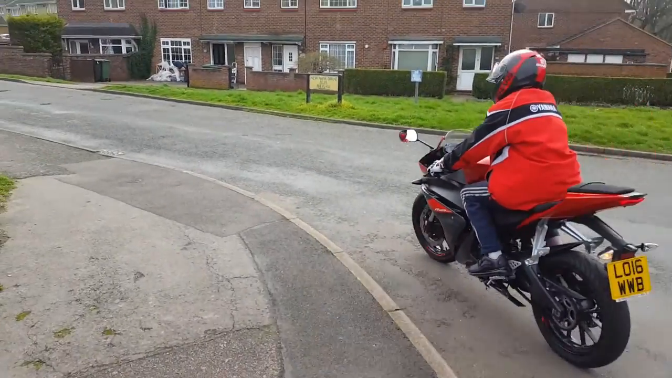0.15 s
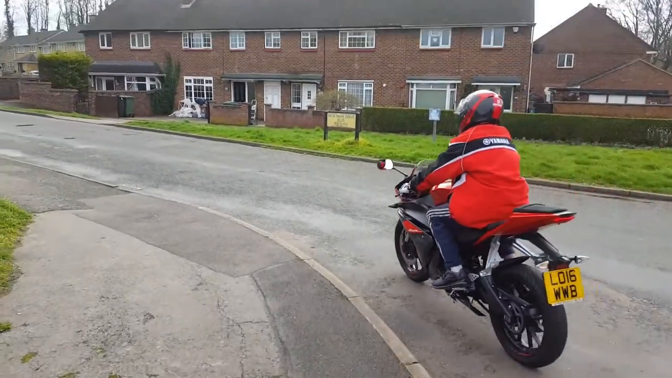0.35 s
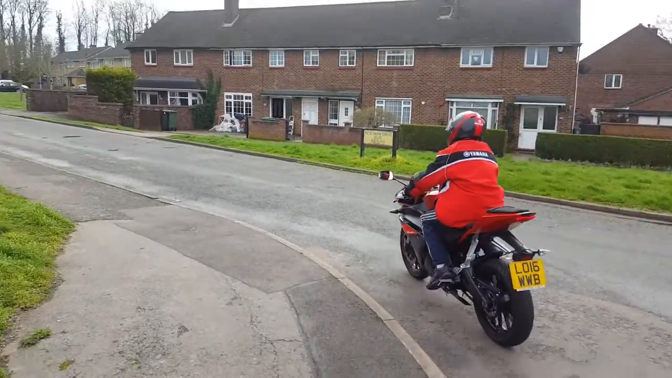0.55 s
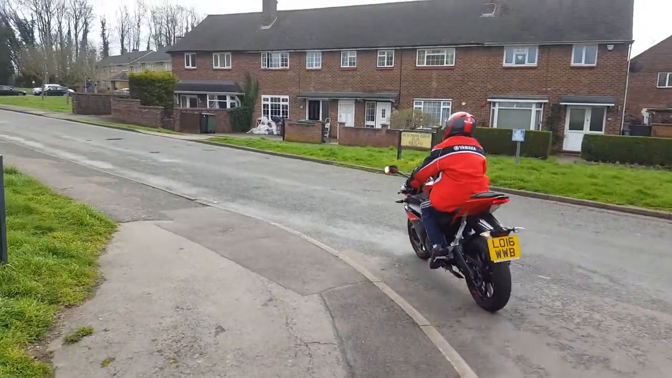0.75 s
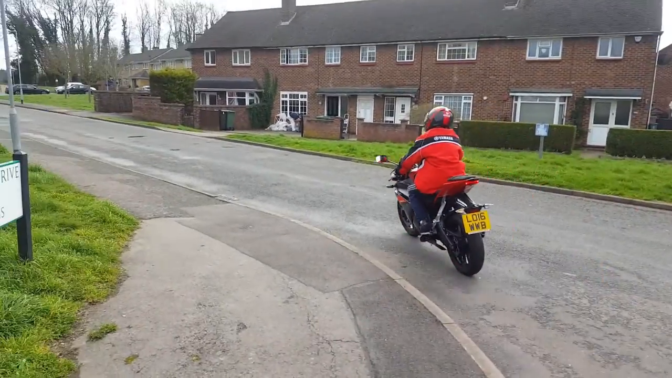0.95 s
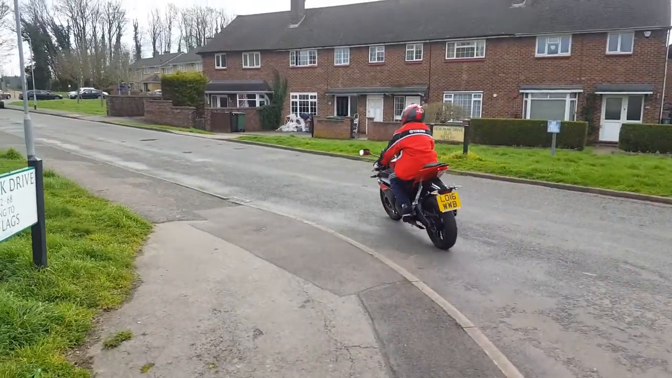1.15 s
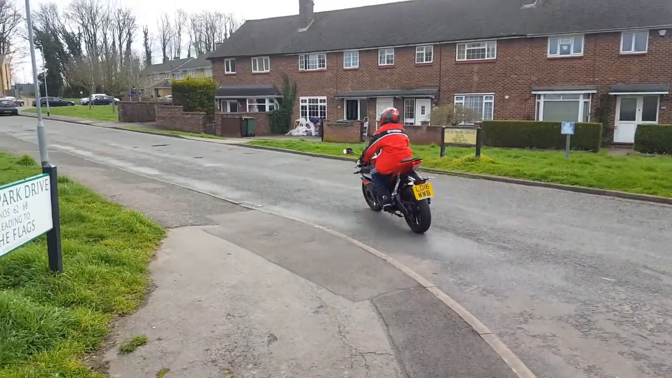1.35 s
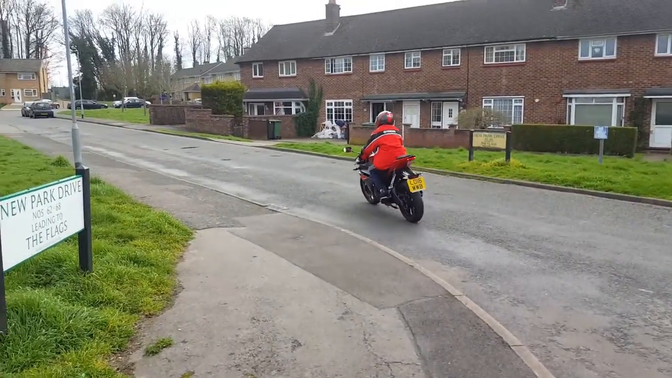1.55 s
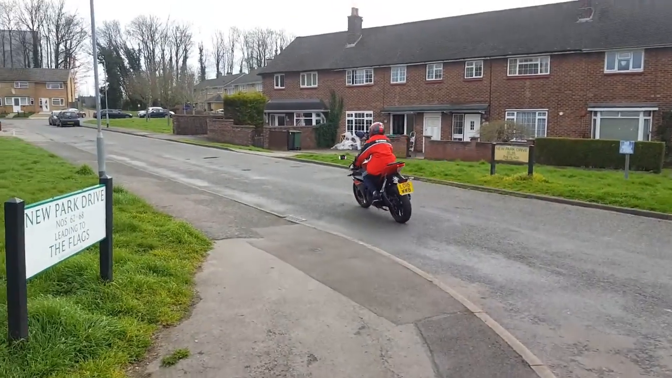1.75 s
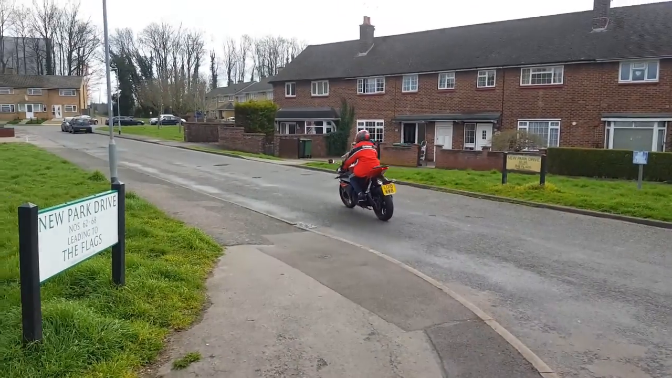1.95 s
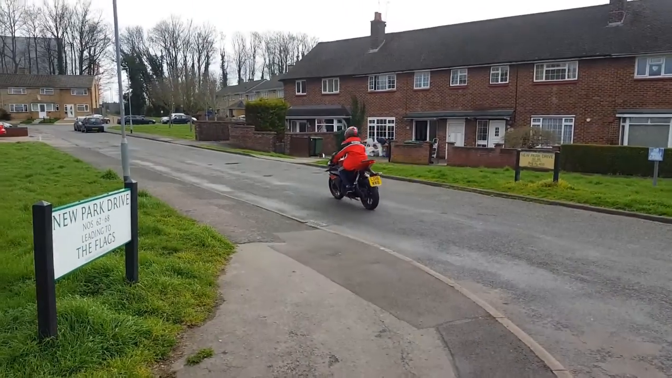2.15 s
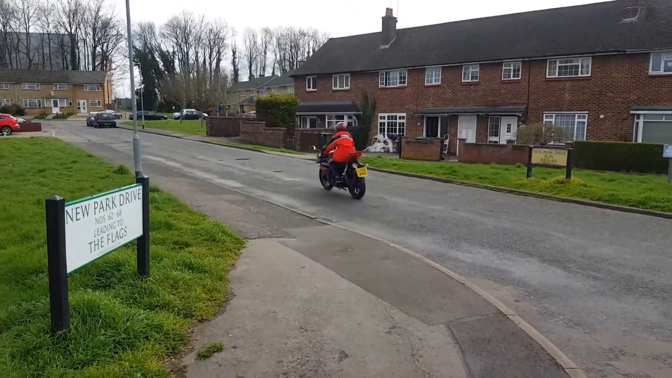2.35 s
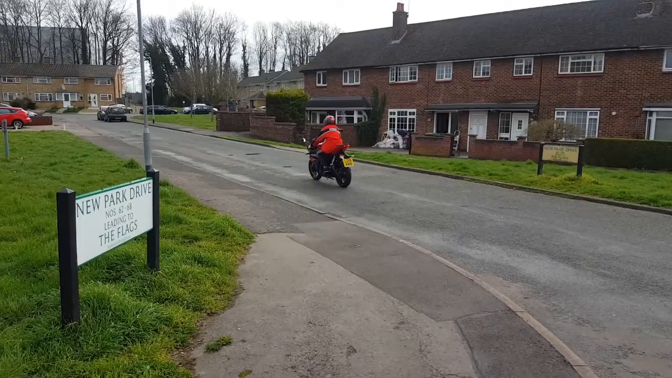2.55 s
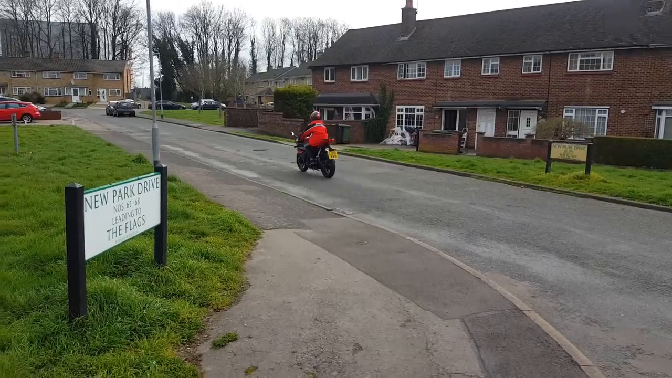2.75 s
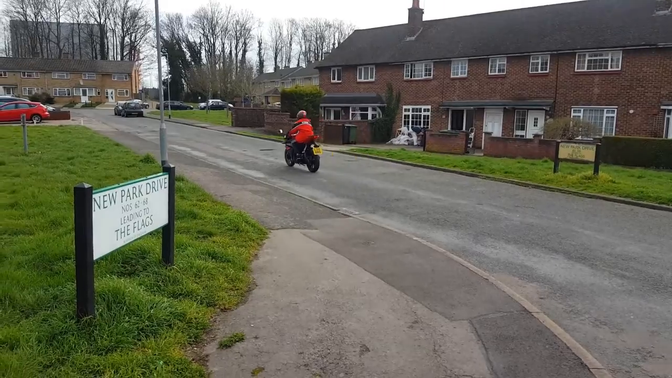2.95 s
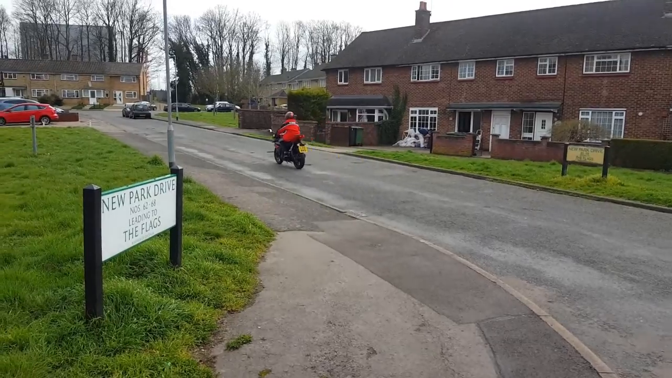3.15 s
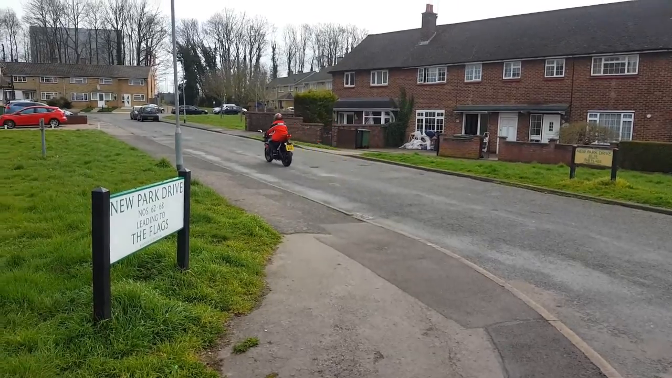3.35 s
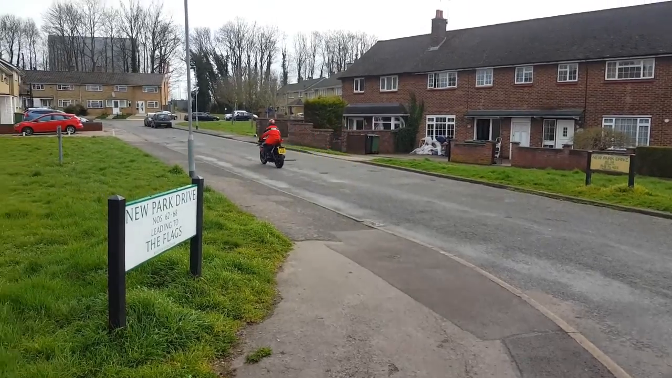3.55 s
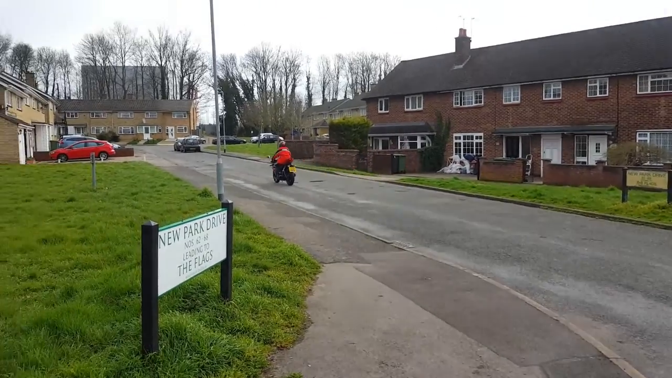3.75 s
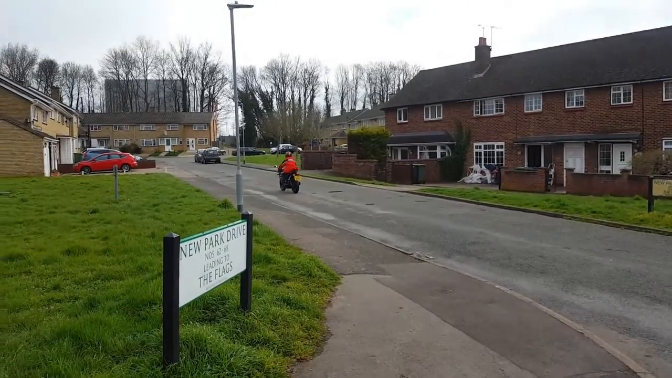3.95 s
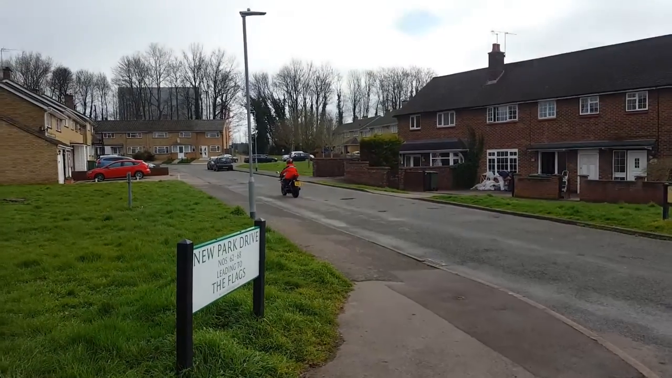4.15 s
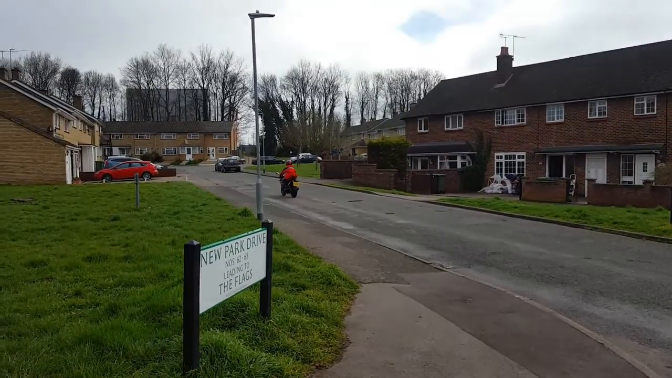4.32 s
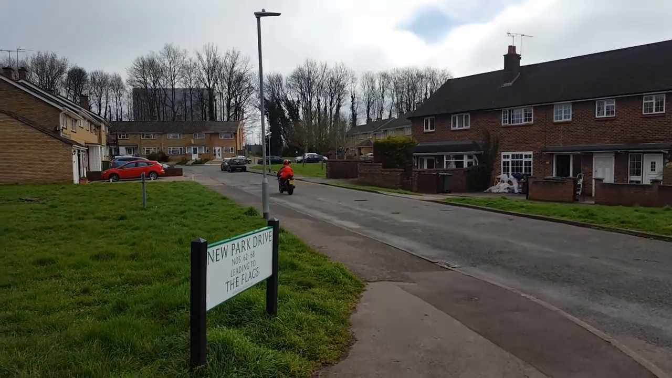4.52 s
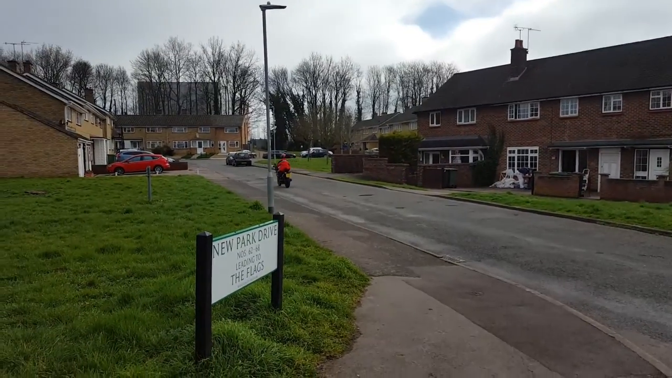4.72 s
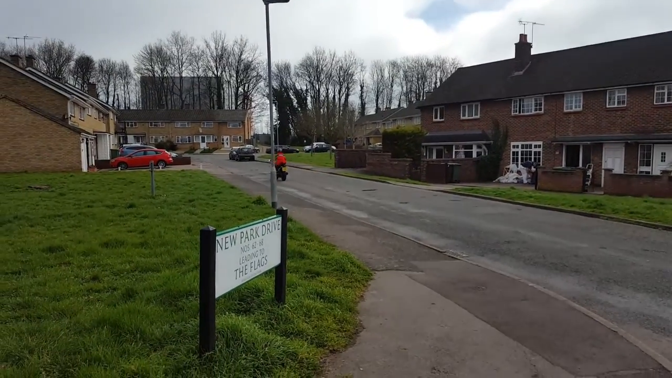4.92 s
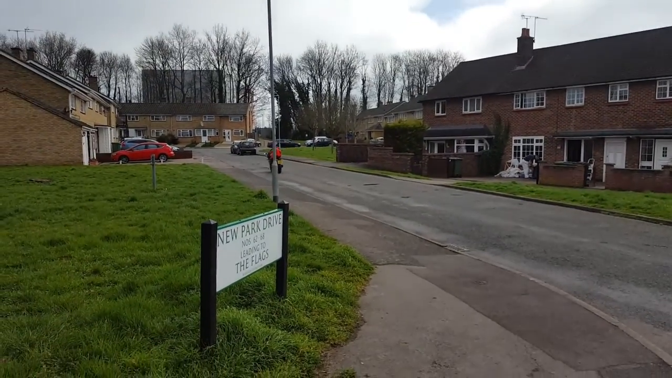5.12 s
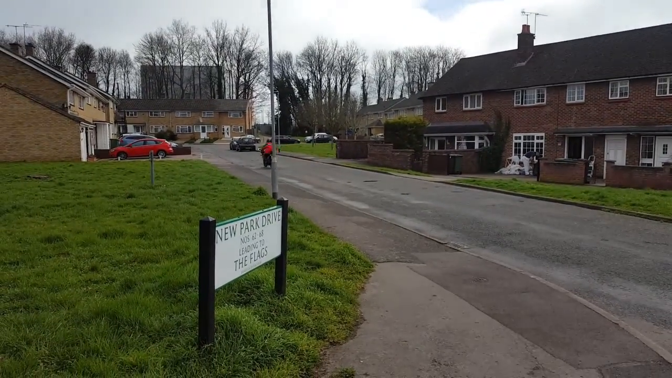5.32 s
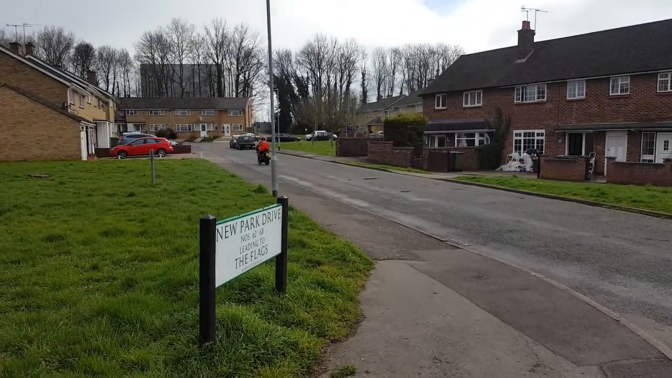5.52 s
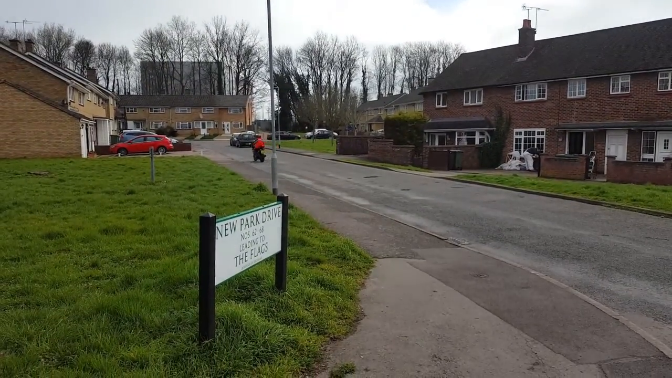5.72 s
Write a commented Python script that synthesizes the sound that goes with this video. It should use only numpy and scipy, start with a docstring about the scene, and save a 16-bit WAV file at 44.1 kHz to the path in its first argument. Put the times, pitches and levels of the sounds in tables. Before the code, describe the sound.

A single-cylinder motorcycle pulls away close by with a buzzing, rattling bark, changes gear, accelerates off along a street and fades to a faint distant idle.

```python
"""A single-cylinder four-stroke motorcycle pulls away from a phone, changes gear and drops to idle far up the street.
Firing: engine orders add to one thud a cycle; gas noise drives silencer and pipe resonances as rumble, bark and rasp.
Engine cases ring to a rattle; a sine whines from the gears; shaped noise ticks in the valve gear, hisses in chain
and tyres. Knocks are short decaying rings. A noise tail smears exhaust, cases, whine, valve ring and knocks as echoes
from house fronts and road; hiss and treble ticks get none. Behind: town noise, two faint hums and a whistle."""
import sys
import numpy as np
from scipy import signal
from scipy.fft import rfft, irfft, next_fast_len
from scipy.io import wavfile
from scipy.ndimage import uniform_filter1d, map_coordinates

SR = 44100
rng = np.random.default_rng(int(sys.argv[2]) if len(sys.argv) > 2 else 0)


def persist_wave(psi):
    """Save psi, clipped to +-1, as 16-bit WAV."""
    counts = np.round(np.clip(psi, -1, 1) * 32767).astype(np.int16)
    wavfile.write(sys.argv[1], SR, np.atleast_2d(counts).T)


N = 259131
LEAD = 4410  # samples the engine has already run
T_S = np.arange(-LEAD, N) / SR


def undb(db):
    """Decibels to gain."""
    return 10 ** (np.asarray(db) / 20)


def level(x, db):
    """Scale to an rms level."""
    return x * undb(db) / np.sqrt(np.mean(x ** 2))


def white(*shape):
    """White noise over the scene and its lead."""
    return rng.standard_normal((*shape, N + LEAD))


def along(table):
    """Columns of a curve table, one value a sample, lead included."""
    s, *columns = np.transpose(table)
    return [np.interp(T_S, s, column) for column in columns]


def colour(x, table, share=1):
    """Filter by (hz, db) points, straight lines over log frequency."""
    hz, db = np.transpose(table)
    size = next_fast_len(x.shape[-1])
    log_hz = np.log(np.arange(1, size // 2 + 2) * SR / size)
    gain = undb(share * np.interp(log_hz, np.log(hz), db))
    return irfft(rfft(x, size) * gain, size)[..., :x.shape[-1]]


def ring(x, modes):
    """Sum of (hz, width_hz, db) band-pass resonances of alternating sign."""
    out = 0
    for k, (hz, width_hz, db) in enumerate(modes):
        b, a = signal.iirpeak(hz, hz / width_hz, SR)
        out = out + (-1) ** k * undb(db) * signal.lfilter(b, a, x)
    return out


def walk(rate_hz):
    """Random levels held 1 / rate_hz and smoothed twice; rms near 0.37."""
    k = int(SR / rate_hz)
    held = np.repeat(rng.standard_normal((N + LEAD) // k + 1), k)
    return 0.5 * uniform_filter1d(uniform_filter1d(held, k), k)[:N + LEAD]


def steady(x, span_s=0.15):
    """Divide out the slow loudness, so that a level curve alone sets it."""
    k = int(span_s * SR)
    power = uniform_filter1d(uniform_filter1d(x ** 2, k), k)
    return x / np.sqrt(power + 1e-18)


def puff(phase, start, length, rise=.05):
    """A burst once a cycle: rise, then exponential fall, times in cycles."""
    since = (phase - start) % 1
    return (1 - np.exp(-since / rise)) * np.exp(-since / length)


MEMORY = .82  # likeness of one burst to the next, 0-1


def bursts(cycles, start, length_s, peak=.3):
    """A noise burst every cycle, each much like the one before, so that engine orders show."""
    at = np.flatnonzero(np.diff(np.floor(cycles - start)))
    x = np.arange(int(length_s * SR)) / (length_s * SR)
    fresh = rng.standard_normal((len(at), len(x)))
    b, a = [np.sqrt(1 - MEMORY ** 2)], [1, -MEMORY]
    alike = signal.lfilter(b, a, fresh, axis=0, zi=MEMORY * fresh[-1:])[0]
    shape = x / peak * np.exp(1 - x / peak) * (1 - x)
    out = np.zeros(len(cycles) + len(x))
    for i, burst in zip(at, alike * shape):
        out[i:i + len(x)] += burst
    return out[:len(cycles)]


# arrival lag of the left port: start_s, left_lag_samples
PORT_LAG = [(0, 4), (1, 2.5), (2, 0), (3, -3), (3.6, -3), (4.2, -1.5), (5.88, -1.5)]


def ports(x):
    """Direct sound reaches the two ports a few samples apart."""
    half_lag, at = along(PORT_LAG)[0] / 2, np.arange(N + LEAD)
    return np.array([map_coordinates(x, [at - side * half_lag], order=3, mode="nearest") for side in (1, -1)])


# short echo close to the phone, shifting as the phone turns: start_s, gain, lag_samples
NEAR_ECHO = [(0, .1, 59), (1.2, .3, 59), (2.2, .2, 58), (2.9, .6, 60), (3.5, .55, 61), (4.1, .4, 62.5),
             (4.8, .4, 63), (5.88, .4, 63)]


def bounce(x):
    """One short delayed copy combs the sound at both ports."""
    gain, lag = along(NEAR_ECHO)
    at = np.arange(N + LEAD)
    return x + gain * np.array([np.interp(at - lag, at, port) for port in x])


# width of scattered sound: freq_hz, side_minus_mid_db
SCATTER_WIDTH = [(30, -10), (60, -7), (200, -19), (380, -9), (700, -10), (1300, 0), (3000, -1), (15000, -2)]


def spread(mid, side):
    """Left and right from two unrelated signals; side weakest in the low mids."""
    return mid + colour(side, SCATTER_WIDTH) * np.array([[1], [-1]])


def faint_tone(phase_rad, db, waver_db, waver_rate_hz, from_s):
    """A wavering sine that fades in over half a second."""
    t = T_S[LEAD:]
    gain = undb(db + waver_db * walk(waver_rate_hz)[:N])
    return np.clip(2 * (t - from_s), 0, 1) * gain * np.sin(phase_rad)


# spectrum of distant traffic and air: freq_hz, relative_density_db
TOWN_SPECTRUM = [(13, -43), (22, -18.5), (150, 0.5), (403, -7.5), (697, -13), (1140, -18.5), (2150, -24.5),
                 (2530, -28.5), (3520, -30), (6980, -40.5), (9440, -56.5), (12400, -48), (15500, -50)]
TOWN_DB = -42  # rms before swelling
HUM_HZ, HUM_SAG_HZ_PER_S, HUM_DB, HUM_FROM_S = 555, -10.5, -55, 1.0
DRONE_HZ, DRONE_DB, DRONE_FROM_S = 581.4, -62, 3.8
WHISTLE_HZ, WHISTLE_DB, WHISTLE_FROM_S = 4915, -72, 4.6


def town():
    """Slowly swelling noise of traffic and air; a sinking hum, a fixed hum and a whistle fade in."""
    t = T_S[LEAD:]
    air = bounce(spread(*colour(white(2), TOWN_SPECTRUM)))[:, LEAD:]
    air = level(air, TOWN_DB) * undb(1.0 * walk(6.85)[:N])
    hum_rad = 2 * np.pi * np.cumsum(HUM_HZ + HUM_SAG_HZ_PER_S * t) / SR
    hum = faint_tone(hum_rad, HUM_DB, 3, 5, HUM_FROM_S)
    drone = faint_tone(2 * np.pi * DRONE_HZ * t, DRONE_DB, 4, 18, DRONE_FROM_S)
    whistle = faint_tone(2 * np.pi * WHISTLE_HZ * t, WHISTLE_DB, 4.4, 13, WHISTLE_FROM_S)
    return air + hum + drone + whistle


STREET_T60_S, STREET_DB = 0.37, -3.5


def street(x):
    """Echoes of the point source from house fronts and road: convolution with a decaying noise tail."""
    t = np.arange(SR // 2) / SR
    tail = rng.standard_normal((2, len(t))) * undb(-60 * t / STREET_T60_S) * (1 - np.exp(-t / 0.0012))
    tail = tail / np.sqrt(np.sum(tail ** 2) / 2)
    tail = colour(tail, [(100, -29.0), (250, -5.0), (500, 3.0), (2000, -5.0), (6000, -30)])
    mid, side = signal.fftconvolve(x[None], tail, axes=1)[:, LEAD:N + LEAD]
    return undb(STREET_DB) * spread(mid, side)


# road bump, gear change, small far ticks, a swish: start_s, level_db (before onset), ring_hz, t60_s, noisiness (0-1)
KNOCK_EVENTS = [(1.490, -6, 230, 0.023, 0.36), (1.912, -21.5, 2440, 0.022, 0.74),
                (5.014, -38, 1590, 0.02, 0.2), (5.019, -35, 1685, 0.025, 0.2), (5.203, -51, 6560, .03, 1),
                (5.312, -47.5, 6300, 0.024, 0.95), (5.487, -40, 1450, .06, 0.26),
                (5.487, -44, 3340, 0.033, 0.4), (5.650, -55, 4150, .1, .7), (5.655, -59, 2750, .09, 0.6),
                (5.675, -50, 3720, 0.22, 0.7)]


def knocks():
    """Short decaying rings, each a mix of sine and band noise."""
    out, t = np.zeros(N), np.arange(6000) / SR
    for start_s, db, hz, t60_s, noisiness in KNOCK_EVENTS:
        band = level(ring(rng.standard_normal(len(t)), [(hz, 0.3 * hz, 0)]), 0)
        burst = noisiness * band + (1 - noisiness) * np.sin(2 * np.pi * hz * t)
        envelope = undb(db - 60 * t / t60_s) * (1 - np.exp(-20 * t / t60_s))
        i = int(start_s * SR)
        out[i:i + len(t)] += envelope * burst
    return out


# gear whine while the clutch takes up: start_s, pitch_hz, level_db (both waver)
GEAR_WHINE = [(.55, 1560, -90), (.7, 1600, -40), (.75, 1635, -37), (.79, 1660, -42), (.84, 1695, -31),
              (.89, 1720, -42), (.96, 1765, -34), (1.12, 1790, -41), (1.35, 1830, -90)]


def gear_whine():
    """Climbing gear whine: a sine with jitter in pitch and level."""
    hz, db = along(GEAR_WHINE)
    phase_rad = 2 * np.pi * np.cumsum(hz * (1 + .007 * walk(40))) / SR
    return np.sin(phase_rad) * undb(db + 2 * walk(18))


# engine speed: start_s, firing_hz
FIRING_RATE = [(0.0, 47.16), (0.14, 44.56), (0.48, 33.91), (0.64, 33.42), (1.0, 36.17), (1.22, 39.31),
               (1.38, 36.4), (1.5, 36.0), (1.7, 36.69), (1.78, 35.38), (2.2, 26.37), (2.32, 30.5),
               (2.39, 32.6), (2.44, 32.6), (2.5, 30.65), (2.64, 26.75), (2.78, 27.83), (3.2, 32.62),
               (3.67, 35.89), (3.85, 31.68), (3.98, 31.12), (4.4, 24.13), (4.55, 20.58), (4.9, 16.31),
               (5.3, 15.1), (5.5, 15.96), (5.7, 14.91), (5.88, 15.22)]
# start_s, throttle (0-1)
THROTTLE_CURVE = [(0, .5), (1.7, .4), (1.9, .2), (2.2, .3), (2.4, 1), (3.6, .9), (3.8, .2), (5.88, .3)]
# start_s, nearness (0-1)
NEARNESS = [(0, 1), (1.8, 1), (2.2, .15), (5.88, .1)]
START_CYCLES = 5.505


def engine():
    """Firing rate, running cycle count, throttle load and nearness, one value a sample."""
    hz, = along(FIRING_RATE)
    cycles = START_CYCLES + (np.cumsum(hz) - hz[0] * LEAD) / SR
    return hz, cycles, along(THROTTLE_CURVE)[0], along(NEARNESS)[0]


def per_cycle(cycles):
    """One random value held through each cycle."""
    count = (cycles + .5).astype(int)
    return rng.standard_normal(count[-1] + 1)[count]


VALVE_RISE = .4  # cycles


def valve_ticks(cycles, near):
    """Two ticks a cycle with uneven strength, distinct only close by."""
    first = undb(2 * per_cycle(cycles)) * 2 * puff(cycles % 1, 0.19, 0.29, VALVE_RISE)
    second = undb(4.3 * per_cycle(cycles)) * puff(cycles % 1, 0.57, 0.089, VALVE_RISE)
    return (first + second) * near


# chain and tyre hiss: freq_hz, relative_density_db
HISS_SPECTRUM = [(1470, -34), (2500, 2.5), (2790, -3), (3140, 2), (4100, -3), (4550, -0.5), (5760, -4.5),
                 (6300, -12), (8190, -13.5), (13900, -120)]
# valve-gear treble: freq_hz, relative_density_db
TICK_SPECTRUM = [(3710, -16), (6300, -3), (7890, -1), (9000, -8.5), (9710, -15.5), (10300, -16.5),
                 (10700, -13.5), (12700, -10), (15500, -17)]


def hiss_and_tick(valves, tick_noise):
    """Noise gated by the valve ticks, partly common to both ports, in a hiss band and a treble band."""
    gate = (valves + .5) * undb(2.0 * walk(14))
    hiss = bounce(colour(gate * (1.07 * white(2) + ports(white())), HISS_SPECTRUM))
    tick = colour(gate * (white(2) + 0.31 * ports(tick_noise)), TICK_SPECTRUM)
    return steady(hiss), steady(tick)


# thin ring of the valve gear: freq_hz, width_hz, gain_db
VALVE_MODE = [(5670, 97, 0)]
# start_s, level_db
VALVE_MODE_LEVEL = [(0, -75), (1.8, -57), (3.6, -69), (4.2, -63.5), (4.7, -65), (5.0, -84), (5.88, -90)]


def valve_ring(cycles, noise):
    """A narrow resonance struck by noise once a cycle."""
    struck = (puff(cycles % 1, 0.29, 0.3, VALVE_RISE) + 0.067) * noise
    return steady(ring(struck, VALVE_MODE)) * undb(along(VALVE_MODE_LEVEL)[0])


# repeating rattle comes with load: start_s, strength (0-1)
RATTLE_KNOCK = [(0, 1), (1.75, 1), (1.9, .4), (2.3, .5), (3, 1), (3.6, 1), (3.8, .2), (5.88, .1)]
KNOCK_S, KNOCK_DB, KNOCK_START_CYCLES = .042, 0, .45  # dB against the loose rattle


def case_rattle(cycles, gas, valves):
    """Loose noise following gas and valves, plus a knock that repeats each cycle."""
    loose = level((0.47 * gas + 0.071 * valves + 1.4) * white(), 0)
    knock = level(bursts(cycles, KNOCK_START_CYCLES, KNOCK_S), KNOCK_DB)
    return loose + along(RATTLE_KNOCK)[0] * knock


# engine cases and fairing, changing as the bike turns away: freq_hz, width_hz, gain_db, slope_db_per_s
CASE_MODES = [(1375, 180, -3.5, 0.6), (1412, 77, 8, -0.5), (1673, 200, 2, 0.16), (1875, 46, 0.5, -3),
              (2133, 294, -6, 0), (2236, 43, 0.5, 1.2), (2312, 35, 1, -1), (2493, 76, -14.5, 2.5),
              (1836, 105, 6.5, -8.5)]
CASES_WAVER_DB = 1.5  # scales a random walk


def case_clatter(rattle):
    """Cases and fairing ring to the rattle; each ring swells and sinks by itself."""
    out = 0
    for k, (*mode, slope_db_per_s) in enumerate(CASE_MODES):
        gain = undb(slope_db_per_s * T_S + CASES_WAVER_DB * walk(9.8))
        out = out + (-1) ** k * ring(rattle, [mode]) * gain
    return out


GAS_START, GAS_LENGTH, GAS_RISE = .6, .15, .2  # cycles


def gas_flow(cycles, load, blow):
    """Under load gas leaves in separate barks; shut, it leaks with a weak pulse."""
    phase = cycles % 1
    barks = load * blow * puff(phase, GAS_START, GAS_LENGTH, GAS_RISE) * 2.4
    return barks + (1 - load) * .3 * (1 + puff(phase, .4, .3))


BLAST_S, BLAST_DB, BLAST_START_CYCLES = .021, -3, .62  # dB against the gas noise, before nearness
BLAST_NEAR_DB = 1.5
INTAKE_BLAST = .85  # strength of a second burst half a cycle later, close by
LEAK_SHUT, LEAK_OPEN = .5, .24  # gas noise between barks


def gas_jet(cycles, load, near, blow, gas):
    """Turbulent gas noise plus bursts that repeat from cycle to cycle."""
    leak = LEAK_SHUT + (LEAK_OPEN - LEAK_SHUT) * load
    turbulence = level((gas + leak) * white(), 0)
    second = near * bursts(cycles, BLAST_START_CYCLES + .5, BLAST_S)
    firing = blow * (bursts(cycles, BLAST_START_CYCLES, BLAST_S) + INTAKE_BLAST * second)
    return turbulence + level(firing, BLAST_DB) * undb(BLAST_NEAR_DB * near)


# tail-pipe strength of the orders: pipe_resonance_multiple, gain_db
PIPE_RESPONSE = [(0.3, -16.5), (0.45, -12.5), (0.6, -1.5), (0.75, -9.5), (0.87, -2), (1.0, 1.5), (1.15, -8),
                 (1.35, -6.5), (1.6, -20), (2.0, -18.5), (2.4, -28.5), (3.0, -33), (4.0, -19)]
# start_s, thud_db, intake_pulse (-1..1 of exhaust), pipe_hz (higher with hot gas), tilt_db_per_octave (upper orders)
THUD_CURVE = [(0.0, -20.5, 1, 197, -32), (0.12, -20.5, 0.71, 177.5, -12), (0.24, -23, 0.52, 157, 0.5),
              (0.36, -25, 1, 184, 2.5), (0.55, -27.5, 0.89, 174, -4.5), (0.9, -28, 0.85, 175.6, 2.5),
              (1.12, -25.5, 1, 168.5, 1.5), (1.3, -29.5, 0.82, 166.4, -1.5), (1.5, -30.5, 0.95, 164, -1.5),
              (1.72, -32, 1, 171, 2.5), (1.8, -28.5, -0.5, 141.4, -3.5), (2.1, -36, 0.027, 115, 5),
              (2.22, -34.5, 0.7, 163.5, 0), (2.5, -27, 0.7, 169.4, 1.5), (2.7, -30, 0.74, 142, 2),
              (3.0, -28, 0.44, 165, 0), (3.3, -29.5, 0.61, 168, -2), (3.42, -31, 0.87, 180, -32),
              (3.66, -31.5, 1, 175, -1), (3.78, -38.5, 0.098, 133, 3), (4.1, -40, 0.16, 131, -1),
              (4.4, -49, 0.14, 101, -5), (4.9, -53.5, 0.22, 137, 6), (5.2, -52.5, -0.16, 137, 2),
              (5.5, -57, -0.11, 145, -1), (5.88, -52.5, 0.4, 128.0, 5)]
# lowest order, one throb a crank turn: start_s, gain_db
THROB_GAIN = [(0, -2), (.3, 4), (.4, 1), (1.2, 1.5), (1.45, -10), (1.72, -3), (1.8, -21), (2.1, -21),
              (2.3, 2), (3.3, 2), (3.6, 2), (3.76, -4), (5.88, -2)]
# band in which the intake pulse is heard: start_s, width_octaves
INTAKE_WIDTH = [(0, 0.93), (.35, 0.69), (1.1, 0.62), (1.35, 1), (1.72, 1.24), (1.8, 0.62), (5.88, 0.66)]
INTAKE_HZ = 88.6  # band centre
CAN_HZ, CAN_WIDTH_HZ, CAN_DB = 356, 20, 6  # silencer can
RING_RAD, RING_WIDTH_HZ, RING_ADVANCE_S, RING_TURN_RAD = 1.5, 50, .004, -1.5  # near phase across the pipe resonance
COAST_WAVER_RAD = 1.0  # scales a random walk


def exhaust(hz, cycles, load, near, blow):
    """Orders pile up into one thud a cycle; an intake pulse half a cycle away lifts or cancels every other one."""
    thud_db, intake, pipe_hz, tilt_db = along(THUD_CURVE)
    throb_db, reach = along(THROB_GAIN)[0], along(INTAKE_WIDTH)[0]
    coast = np.clip(4 - 10 * load, 0, 1) * (hz > 22)
    out = 0
    for order in range(2, 15):
        tone_hz = order * hz
        multiple = tone_hz / pipe_hz
        db = thud_db + np.interp(multiple, *np.transpose(PIPE_RESPONSE))
        db = db + tilt_db * np.maximum(np.log2(multiple), 0) + throb_db * (order == 2)
        db = db + CAN_DB * np.exp(-((tone_hz - CAN_HZ) / CAN_WIDTH_HZ) ** 2)
        intake_band = np.exp(-(np.log2(tone_hz / INTAKE_HZ) / reach) ** 2)
        pair = 1 + (-1) ** order * intake * intake_band
        lead_rad = 0.027 * np.maximum(tone_hz - 230, 0) + 0.06 * np.minimum(tone_hz - 85, 0)
        ring_rad = RING_RAD * np.arctan((tone_hz - pipe_hz) / RING_WIDTH_HZ)
        lead_rad = lead_rad + near * (RING_TURN_RAD + 2 * np.pi * RING_ADVANCE_S * tone_hz - ring_rad)
        lead_rad = lead_rad + COAST_WAVER_RAD * coast * walk(20)  # shut, each order slips by itself
        out = out + pair * undb(db) * np.cos(2 * np.pi * order * cycles + lead_rad)
    return np.sqrt(2) * blow * out


SCATTER_DB, IDLE_SCATTER_DB, COAST_SCATTER_DB = 1.1, 1.2, 1.5  # summed where they apply


def combustion(hz, cycles, load):
    """Strength differs from cycle to cycle, more at idle and with the throttle shut."""
    scatter_db = SCATTER_DB + IDLE_SCATTER_DB * (hz < 22) + COAST_SCATTER_DB * (load < .3)
    return uniform_filter1d(undb(scatter_db * per_cycle(cycles)), size=300)


BEAT_HZ, BEAT_DEPTH, BEAT_PEAK_S, BEAT_SPAN_S = 6.8, .7, 3.98, .45


def coasting_beat(load):
    """The far coasting note throbs: a brief amplitude beat at low throttle."""
    since_s = T_S - BEAT_PEAK_S
    depth = BEAT_DEPTH * np.exp(-(since_s / BEAT_SPAN_S) ** 4) * (load < .5)
    return uniform_filter1d(1 + depth * np.cos(2 * np.pi * BEAT_HZ * since_s), size=600)


# base levels before offsets and air: start_s, gas_db, moving_parts_db, treble_db
RIDE_LEVELS = [(0, -23.5, -27.5, -32.5), (.18, -25.5, -29, -35), (.23, -27, -29.5, -38.5),
               (.5, -31.5, -33.5, -43.5), (.8, -36, -33.5, -44.5), (1.05, -34, -33, -44.5),
               (1.42, -38, -35, -48), (1.75, -36.5, -37, -50.5), (1.92, -39.5, -37.5, -52),
               (2.14, -41.5, -43.5, -59), (2.33, -39, -39, -56), (2.5, -32.5, -37, -56.5),
               (2.66, -38.5, -40, -57), (2.95, -37.5, -37.5, -56), (3.3, -38, -37.5, -57),
               (3.62, -37.5, -38.5, -62), (3.78, -46.5, -42.5, -69), (4.05, -47.5, -45.5, -69.5),
               (4.62, -54.5, -54, -60.5), (4.8, -56.5, -57.5, -72), (5.5, -56, -60, -91.5),
               (5.88, -73, -68, -80)]
# low response: freq_hz, gain_db
SILENCER_RESPONSE = [(40, -4.5), (65, 1), (88, 6), (108, -0.5), (160, 9), (225, 4), (250, 0), (355, 4),
                     (400, -6), (500, -13), (1000, -40), (4000, -93)]
# gas-driven pipe resonances: freq_hz, width_hz, gain_db
BARK_MODES = [(529, 145, -5), (667, 233, -3), (729.5, 88, 1.5)]
# upper pipe resonances: freq_hz, width_hz, gain_db
RASP_MODES = [(777, 49, 8), (955.5, 56, 8), (1040.4, 65, 4)]
# engine flank, lost as the bike turns its back: freq_hz, width_hz, gain_db
FLANK_MODE = [(1150, 540, 0)]
# little treble from the exhaust side: freq_hz, gain_db
AIR_RESPONSE = [(2700, -1.5), (3600, -8.5), (8000, -47)]
# offsets at 0 s and slopes, against the gas or moving-parts level
RUMBLE_DB, RUMBLE_DB_PER_S, CAN_RING_DB, CAN_RING_DB_PER_S = -3, 1.7, -15, -0.45
BARK_DB, BARK_DB_PER_S, HISS_DB, HISS_DB_PER_S = -7, 1, -3.2, -0.8
FLANK_DB_PER_S = -10
BARK_LOAD_DB, HISS_LOAD_DB = 3.5, -3  # change from shut to open throttle


def motorcycle():
    """Exhaust, cases, whine and valve ring as one point source; hiss and treble ticks wide at both ports."""
    hz, cycles, load, near = engine()
    gas_db, parts_db, treble_db = along(RIDE_LEVELS)
    blow = combustion(hz, cycles, load)
    gas = gas_flow(cycles, load, blow)
    jet = gas_jet(cycles, load, near, blow, gas)
    valves = valve_ticks(cycles, near)
    rattle = case_rattle(cycles, gas, valves)
    rumble = colour((gas + 3.7) * white(), SILENCER_RESPONSE)
    bark = ring(ring(jet, BARK_MODES), [(682, 360, 0)])
    rasp = ring(ring(jet, RASP_MODES), [(903, 297, 0)])
    can = ring(jet, [(CAN_HZ, CAN_WIDTH_HZ, 0)])
    rough = [
        (rumble, gas_db + RUMBLE_DB + RUMBLE_DB_PER_S * T_S),
        (bark, gas_db + BARK_DB + BARK_DB_PER_S * T_S + BARK_LOAD_DB * load),
        (rasp, gas_db),
        (case_clatter(rattle), parts_db),
        (ring(rattle, FLANK_MODE), parts_db + FLANK_DB_PER_S * T_S),
        (can, gas_db + CAN_RING_DB + CAN_RING_DB_PER_S * T_S),
    ]
    rough_sum = sum(steady(x) * undb(db) for x, db in rough)
    tick_noise = white()  # shared by tick and valve ring
    thud = exhaust(hz, cycles, load, near, blow * coasting_beat(load))
    point = thud + gear_whine() + colour(rough_sum, AIR_RESPONSE) + valve_ring(cycles, tick_noise)
    hiss, tick = hiss_and_tick(valves, tick_noise)
    hiss_db = parts_db + HISS_DB + HISS_DB_PER_S * T_S + HISS_LOAD_DB * load
    return point, hiss * undb(hiss_db) + tick * undb(treble_db)


def scene():
    """Bike and knocks, street echoes of the point source, town."""
    point, wide = motorcycle()
    point[LEAD:] += knocks()
    return (ports(point) + wide)[:, LEAD:] + street(point) + town()


# port response: freq_hz, left_minus_right_db
PORT_RESPONSE = [(250, -.1), (380, .2), (700, -.3), (1290, -.8), (2400, -.7), (4400, -1.2), (6500, 3.5),
                 (8100, 7), (15000, 7)]
TOP_HZ = 15650


def record(dry):
    """The two ports differ, mostly in the treble; a steep low-pass cuts the top."""
    heard = np.array([colour(port, PORT_RESPONSE, share=side / 2) for port, side in zip(dry, (1, -1))])
    return signal.sosfilt(signal.ellip(10, .2, 80, TOP_HZ, fs=SR, output="sos"), heard)


dry = scene()
out = record(dry)
persist_wave(out)
```